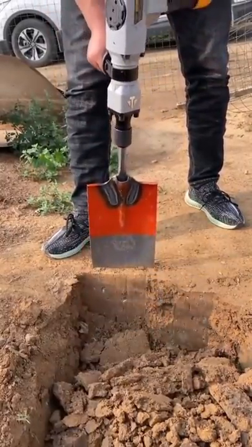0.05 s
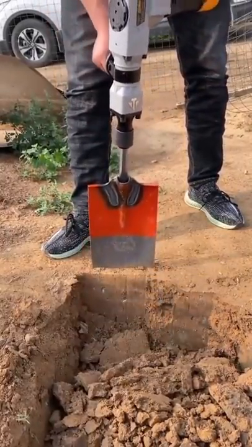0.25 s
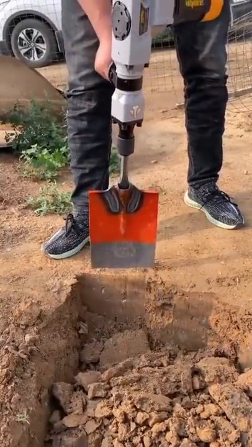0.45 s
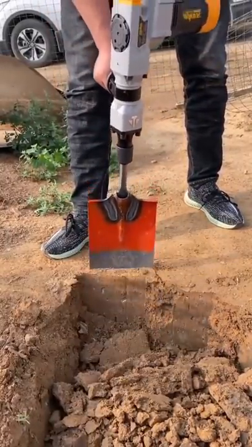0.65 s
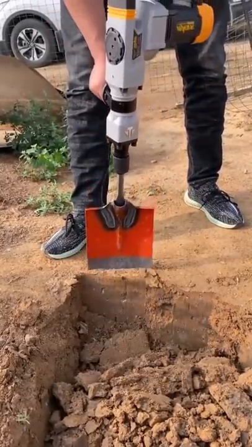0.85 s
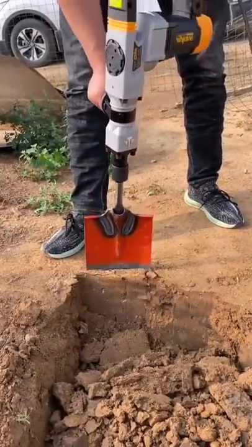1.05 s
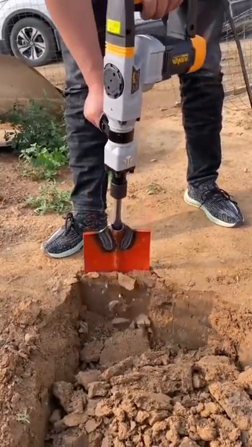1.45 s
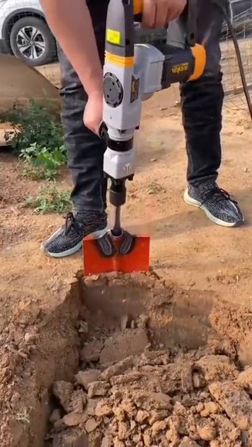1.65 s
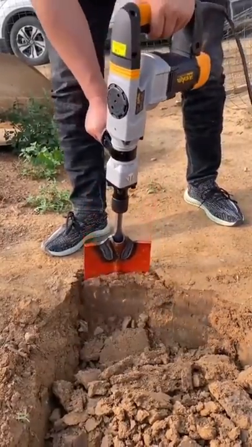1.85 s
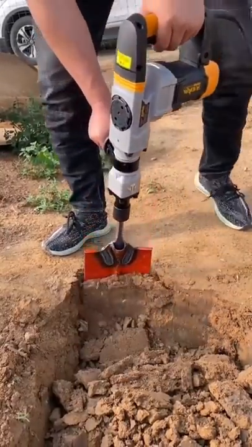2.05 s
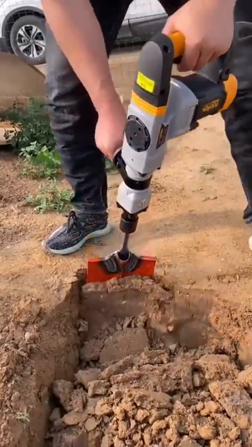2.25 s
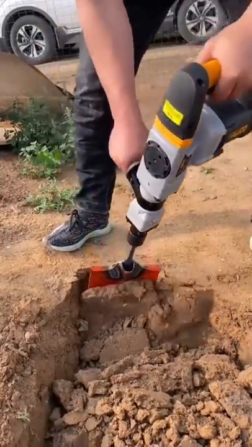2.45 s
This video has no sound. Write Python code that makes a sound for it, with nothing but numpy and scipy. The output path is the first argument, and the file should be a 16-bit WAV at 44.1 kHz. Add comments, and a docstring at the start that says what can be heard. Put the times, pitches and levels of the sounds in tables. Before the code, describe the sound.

An electric hammer spade pounds rapidly into dry soil with bright steel clatter, then stops.

```python
"""Rapid, bright steel hammering, close by and outdoors: an electric hammer drives a spade into dry soil
at about 39 blows a second. Each blow clashes in the chuck, rings the shank and sends a falling bending
wave through the blade, which the soil damps as it sinks in.
Then the motor coasts down and crumbs of soil trickle into the pit."""
import sys
import numpy as np
from scipy import signal
from scipy.fft import irfft
from scipy.io import wavfile
from scipy.ndimage import uniform_filter1d

SR = 44100
rng = np.random.default_rng(int(sys.argv[2]) if len(sys.argv) > 2 else 0)


def log_audio(samples):
    """Write samples as a 16-bit WAV file to the path given in sys.argv[1]."""
    # one column per channel
    frames = np.atleast_2d(samples).T
    # limit to full scale, then quantise
    limited = np.clip(frames, -1, 1)
    pcm = np.round(limited * 32767).astype(np.int16)
    wavfile.write(sys.argv[1], SR, pcm)


N = 114660
T = np.arange(N) / SR
BLOW_SAMPLES = 4096
BLOW_T, BLOW_HZ = T[:BLOW_SAMPLES], np.fft.rfftfreq(BLOW_SAMPLES, 1 / SR)
FIRST_BLOW_S, LAST_BLOW_S = .2376, 2.355

# blow strength (time [s], clash [dB], ping [dB], knock [dB], flex [dB], thump [dB])
BLOW_LEVELS = [(0.238, -6, -4.5, -16, -19, -18), (0.279, 4, 1, 8.5, 2.5, 13.5),
               (0.382, 2.5, 7.5, 6, 6.0, 9), (0.441, 1.5, -2, 4.5, -2.5, 14.5),
               (0.47, 1.5, 4.5, 2.5, 7, 9.5), (0.525, 1, 1.5, 4.5, -2, 9.0), (0.552, 0, -7, 4, 11, 15.5),
               (0.579, 2, 1, 7.5, 10, 0.5), (0.712, 1.5, -2.5, 4, 10, 12.5),
               (0.79, -0.5, -14, 4.5, 12.5, 3.5), (0.894, 1, -3, 3, -2.5, -11), (0.945, 1.5, 4, -3.5, 1, 3),
               (0.997, -0.5, 4, -9, -21, 0), (1.048, 1, 2.5, -15, -3, 6.5), (1.074, -0.5, -2, -10, -16, 1),
               (1.151, 1.5, -2, -2, -12, -8), (1.177, 2.5, 4.5, -5, -17, -11.0),
               (1.203, 1.5, -1, 3, -19, -5), (1.228, -1.5, -1.5, -3, -7, -4),
               (1.28, 1.5, -0.5, 3.5, -7.5, -9), (1.408, -3.5, 2.5, 3.5, -7, -0.5),
               (1.486, 0, 3, -11, -2, -5), (1.537, -0.5, 1.5, -1.5, -12, -1),
               (1.718, -1.0, -1, 1, -7, -1.5), (1.821, -3.5, -7, -6.5, 0.5, -3),
               (1.924, 0, -17, -0.5, -3.5, 1.5), (1.976, -1, -13, -2.5, -8, -16),
               (2.157, -0.5, -5, -6, -9.5, -3), (2.236, -3.5, -7.5, -21, -9, -7),
               (2.289, -4, 2, -7, -5.5, -16), (2.316, -7, 0.5, -22, -21, -23),
               (2.343, -15, -14.5, -21, -16, -35)]
# gear and chatter envelope (time [s], level [dB])
MOTOR_LEVEL = [(0, -110), (.14, -121), (.195, -88), (.228, -75), (.265, -63), (.3, -42), (.4, -35),
               (.75, -35.5), (1.2, -39.5), (1.8, -40), (2.2, -42.5), (2.32, -42), (2.36, -56.5),
               (2.42, -81), (2.6, -99)]
# free-running motor, also colours the crumbs (frequency [Hz], level [dB])
COAST_SPECTRUM = [(40, -25), (260, -22.5), (430, -6.5), (610, -22.5), (820, -7), (1040, -3.5),
                  (1280, -13.5), (1600, -3), (2140, -6.5), (2600, -1), (3340, -10.5), (4300, -6),
                  (5100, -12), (6200, -9.5), (8300, -12.5), (10300, -18), (11800, -22.5), (13000, -39)]


def amp(db):
    """Decibels to gain."""
    return 10 ** (np.asarray(db) / 20)


def unit(x):
    """Scale to rms 1."""
    return x / np.sqrt(np.mean(x ** 2) + 1e-20)


def curve(table, time_s, column=1):
    """Interpolate one column of a time table."""
    table = np.array(table)
    return np.interp(time_s, table[:, 0], table[:, column])


def spectrum(table, hz):
    """Interpolate a dB table over log frequency."""
    knots_hz, db = np.transpose(table)
    return np.interp(np.log(hz + 1), np.log(knots_hz + 1), db)


def colour(x, table):
    """Minimum-phase filter of unit energy with the given spectrum."""
    log_gain = np.log(amp(spectrum(table, abs(np.fft.fftfreq(BLOW_SAMPLES, 1 / SR)))))
    response = np.exp(np.conj(signal.hilbert(log_gain)))
    taps = np.fft.ifft(response).real[:BLOW_SAMPLES // 2]
    return signal.oaconvolve(x, taps / np.linalg.norm(taps))[:N]


def wander(samples):
    """Smooth random drift, rms 1."""
    return unit(uniform_filter1d(uniform_filter1d(rng.standard_normal(N), samples), samples))


def decay(t, t60_s):
    """Exponential decay from t = 0, zero before."""
    return (t >= 0) * np.exp(-np.log(1000) * np.maximum(t, 0) / t60_s)


def swell(t, peak_s, width_s):
    """Gaussian envelope."""
    return np.exp(-((t - peak_s) / width_s) ** 2)


def add(mix, start_s, sound):
    """Mix a sound in place."""
    part = mix[round(start_s * SR):][:len(sound)]
    part += sound[:len(part)]


def air():
    """Quiet outdoor air, fainter from the first blow on."""
    # air noise (frequency [Hz], level [dB])
    air_spectrum = [(25, -14), (100, -8), (280, -17.5), (550, -29.5), (16000, -36.5)]
    return amp(-85 - 7 * (T > FIRST_BLOW_S)) * colour(rng.standard_normal(N), air_spectrum)


def crumbs():
    """Loosened soil patters into the pit."""
    rate_per_s = 360
    grains = (rng.random(N) < rate_per_s / SR) * rng.standard_normal(N)
    burst = rng.standard_normal(BLOW_SAMPLES) * decay(BLOW_T, t60_s=.018)
    patter = colour(signal.oaconvolve(grains, burst)[:N], COAST_SPECTRUM)
    return amp(-69) * unit(patter) * swell(T, peak_s=2.52, width_s=.062)


def motor(turns):
    """Gears grind with each crank turn; switched off, the motor coasts with a sinking whine."""
    # gears and fan (frequency [Hz], level [dB])
    gear_spectrum = [(100, 6), (350, -3.5), (700, -17.5), (1200, -3.5), (2200, -8.5), (2750, 3.5),
                     (3200, -5.5), (4500, -4.5), (5150, -6.5), (6000, 1.5), (8000, 6), (9600, 9.5),
                     (10600, 6.5), (11200, 6.5), (13000, 7), (16000, -19)]
    swing_db = 2 * np.cos(2 * np.pi * (turns + .043))
    grind = unit(rng.standard_normal(N) * amp(-2 * wander(40) + 2 * wander(400) + swing_db))
    gears = colour(grind * amp(curve(MOTOR_LEVEL, T)), gear_spectrum)

    start_s, rise_s, fade_db_per_s, sag_hz_per_s = .145, .09, 17, 2200
    since_off_s = T - LAST_BLOW_S
    spin_up = np.clip((T - start_s) / rise_s, 0, 1) ** 2
    whirr_db = -61.5 + 1.5 * wander(300) - fade_db_per_s * np.maximum(since_off_s, 0)
    whine_hz = 2780 - sag_hz_per_s * since_off_s + 22 * wander(100)
    phase = 2 * np.pi * np.cumsum(whine_hz) / SR
    whine = np.sin(phase) + amp(-9) * np.sin(2.31 * phase)
    whine *= amp(-62.5) * swell(T, peak_s=2.445, width_s=.06)
    whirr = spin_up * amp(whirr_db) * colour(rng.standard_normal(N), COAST_SPECTRUM)
    return gears + whine + whirr


def chatter():
    """Loose parts in the chuck clink at random, following the motor level."""
    rate_per_s, spread_db = 260, 5
    sizes = amp(spread_db * np.minimum(rng.exponential(1, N), 3))
    clinks = sizes * (rng.random(N) < rate_per_s / SR)
    power = signal.oaconvolve(clinks ** 2, decay(BLOW_T, t60_s=.02) ** 2)[:N]
    return amp(curve(MOTOR_LEVEL, T) - 3) * unit(np.sqrt(abs(power)) * rng.standard_normal(N))


def bending_wave(gain):
    """Low bending waves travel slower: a knock falls to a deep thump."""
    delay_s, lead_s = .0155, .0031  # group delay = delay_s * sqrt(100 Hz / f) - lead_s
    phase = .8 - 2 * np.pi * (2 * delay_s * np.sqrt(100 * BLOW_HZ) - lead_s * BLOW_HZ)
    return irfft(gain * np.exp(1j * phase))[:BLOW_SAMPLES // 2]


def bites(blows):
    """On some blows the blade bites hard soil with a pitched thud."""
    # thuds, each on its nearest blow (time [s], pitch [Hz], level [dB])
    thuds = [(.279, 950, 3), (.316, 990, 7), (.382, 1020, -1), (.412, 300, 6), (.442, 370, 6),
             (.498, 460, 10.5), (.606, 350, 8), (.633, 417, -5), (.659, 1050, 5.5), (.686, 388, 13),
             (.712, 420, 3), (.738, 540, 7), (.764, 800, 4), (.79, 900, 11), (.816, 960, 5),
             (.842, 1480, 9), (.893, 1500, 5.5), (.945, 275, -7), (1.049, 227, -3), (1.229, 455, 0),
             (1.332, 418, 1.5), (1.383, 1090, 7.5), (1.975, 990, 3.5), (2.001, 930, 4), (2.155, 860, -8)]
    out = np.zeros(N)
    for near_s, pitch_hz, db in thuds:
        blow_s = min((s for s, _ in blows), key=lambda s: abs(s - near_s))
        width_hz = 36 + .048 * pitch_hz
        peak = np.exp(-.5 * ((BLOW_HZ - pitch_hz) / width_hz) ** 2)
        add(out, blow_s, bending_wave(amp(db) * peak))
    return out


def flex(blows):
    """Each blow bends the blade, damped by the soil around it."""
    # bending wave (frequency [Hz], level [dB])
    flex_spectrum = [(25, -40), (35, -14), (50, 2.5), (75, -1), (120, -3), (200, -2), (400, -9),
                     (550, -10.5), (700, -40), (900, -19), (1200, -10), (2000, -20)]
    base_db = 4.5 + spectrum(flex_spectrum, BLOW_HZ)
    knots_hz = np.geomspace(50, 2000, num=18)
    dc_block = BLOW_HZ / (BLOW_HZ + 10)
    out = np.zeros(N)
    for blow_s, _ in blows:
        knock_db, flex_db, thump_db = (curve(BLOW_LEVELS, blow_s, column) for column in (3, 4, 5))
        soil_db = spectrum([(100, thump_db), (190, flex_db), (500, flex_db), (800, knock_db)], BLOW_HZ)
        scatter_db = 3.2 * spectrum(np.c_[knots_hz, rng.standard_normal(len(knots_hz))], BLOW_HZ)
        add(out, blow_s, bending_wave(amp(base_db + soil_db + scatter_db) * dc_block))
    return out


def blade(blows, drive):
    """The blade knocks on the soil and flexes."""
    # hollow knock (frequency [Hz], level [dB])
    knock_spectrum = [(250, -9), (550, 0.5), (800, 0.5), (1000, -1), (1300, -3), (1700, 3), (2300, -4.5),
                      (4000, -23.5)]
    knock_over_clash_db = curve(BLOW_LEVELS, T, column=3) - curve(BLOW_LEVELS, T)
    knock = amp(knock_over_clash_db - 15.5) * colour(drive, knock_spectrum)
    rumble_cut = signal.butter(2, 45, "high", fs=SR, output="sos")
    return signal.sosfilt(rumble_cut, knock + flex(blows))


def dead_band(x):
    """A notch that shifts as the blade sinks."""
    # notch path (time [s], centre [Hz], depth [0-1])
    notch = [(.28, 630, 0.84), (.35, 650, 0.75), (.42, 735, 0.66), (.5, 660, 0.25), (.59, 713, 1),
             (.71, 700, 1), (.765, 696, 0.14), (.795, 424, 1), (.85, 450, 1), (.9, 630, 0.93),
             (.96, 675, 0), (1.02, 520, 0.9), (1.13, 525, 1), (1.17, 640, 0.5), (1.23, 233, 0.83),
             (1.29, 510, .85), (1.35, 560, 0.77), (1.46, 620, .9), (1.6, 685, 0.43), (1.7, 810, 0),
             (1.82, 800, 0.54), (1.94, 620, 0.83), (2.04, 530, 0.1), (2.1, 815, 0.27), (2.2, 580, 0.96),
             (2.29, 700, 0), (2.36, 594, 0.5)]
    width_hz = 340
    carrier = np.exp(2j * np.pi * np.cumsum(curve(notch, T)) / SR)
    lowpass = signal.butter(2, width_hz / 2, fs=SR, output="sos")
    baseband = signal.sosfiltfilt(lowpass, signal.hilbert(x) / carrier)
    return x - curve(notch, T, column=2) * (carrier * baseband).real


def ping(blows):
    """The shank's main note swells after each blow, then is choked; soil deadens it over time."""
    pitch_hz, damping_db_per_s = 5125, 2.5
    out = np.zeros(N)
    for blow_s, _ in blows:
        late, phase, detune = rng.standard_normal(3)
        peak_s = .006 * (1 + .15 * late)
        tail = amp(-16) * decay(BLOW_T - peak_s, t60_s=.07)
        envelope = np.maximum(swell(BLOW_T, peak_s, width_s=.0034), tail)
        note = np.sin(2 * np.pi * pitch_hz * (1 + .009 * detune) * BLOW_T + .9 * phase)
        level_db = -24.5 - damping_db_per_s * blow_s + curve(BLOW_LEVELS, blow_s, column=2)
        add(out, blow_s, amp(level_db) * envelope * note)
    return out


def ring(drive):
    """Blows and chatter ring the steel; the load shifts each mode's pitch and strength."""
    # shank and blade modes (frequency [Hz], bandwidth [Hz], level [dB])
    modes = [(2633, 136, -18), (2873, 180, -10.5), (3738, 100, -10.5), (4340, 174, -9.5), (5064, 140, -6),
             (6264, 73, -7.5), (7960, 300, -9), (8370, 430, -5), (8810, 100, -6.5), (9360, 200, -2.5),
             (9490, 130, -8.5), (9950, 230, -7.5)]
    drift, swing_db = .006, 4.5
    out = np.zeros(N)
    for hz, width_hz, db in modes:
        carrier = np.exp(2j * np.pi * np.cumsum(hz * (1 + drift * wander(1500))) / SR)
        pole = np.exp(-np.pi * width_hz / SR)
        push = drive * amp(db + swing_db * np.clip(wander(700), -2, 2))
        out += (carrier * signal.lfilter([np.sqrt(1 - pole ** 2)], [1, -pole], push / carrier)).real
    return amp(-8) * out


def snap(x, turns):
    """The top treble peaks at each contact and varies with how squarely the blow lands."""
    cutoff_hz, scatter_db, fall_db_per_s = 10970, 10.5, 7
    treble = signal.sosfiltfilt(signal.butter(8, cutoff_hz, "high", fs=SR, output="sos"), x)
    swing_db = 3 * np.cos(2 * np.pi * (turns - .1)) + scatter_db * wander(700)
    treble_db = (swing_db - 14 - fall_db_per_s * T) * (T < LAST_BLOW_S)
    return x + treble * (amp(treble_db) - 1)


def clash(drive):
    """Rattle in the chuck, heard as bright steel."""
    # steel on steel (frequency [Hz], level [dB])
    clash_spectrum = [(300, -26), (700, -20.5), (1000, -13), (1900, 0.5), (2400, 0), (2800, 2.5),
                      (3200, -1), (3800, -3), (4050, 1), (4300, -2.5), (4750, 0), (5400, 6.5), (6000, 2),
                      (6300, -1), (6650, 2), (7900, 6.5), (9700, -1), (10600, 2.5), (10900, -9.5),
                      (12000, -4.5), (13200, -18.5), (16000, -34.5)]
    return amp(-2.5) * colour(drive, clash_spectrum)


def rattle(blows):
    """The striker slides in and cracks on the shank, which rattles and rebounds in the chuck."""
    lead_s, slide_s, rise_s, rebound_s, sink_s = .008, .002, .0013, .0036, .25
    alike = .52  # blow-to-blow noise correlation
    out, t = np.zeros(N), BLOW_T - lead_s
    grain = rng.standard_normal(BLOW_SAMPLES)
    for blow_s, gain in blows:
        grain = alike * grain + np.sqrt(1 - alike ** 2) * rng.standard_normal(BLOW_SAMPLES)
        length, hardness, late, bounce, flight = rng.random(5)
        # longer until the blade has sunk in
        hold_s = .0037 * (.5 + length) + .004 * np.exp(-(blow_s - FIRST_BLOW_S) / sink_s)
        slide = amp(-29) * np.exp(-abs(t) / slide_s)
        body = amp(-27) * np.clip(t / rise_s, 0, 1) * decay(np.maximum(t - hold_s, 0), t60_s=.031)
        crack = amp(-28.5) * (.5 + hardness) * decay(t - rise_s * late, t60_s=.005)
        rebound = amp(-43) * 2 * bounce * decay(t - rebound_s * (1 + flight) / 2, t60_s=.005)
        add(out, blow_s - lead_s, gain * grain * (slide + body + crack + rebound))
    return out


def crank():
    """One blow per turn: returns turns since the first blow, and blows as (time [s], gain)."""
    # hammer speed (time [s], rate [blows/s])
    speed = [(0.24, 22.41), (0.3, 27.26), (0.37, 31.98), (0.45, 35.16), (0.56, 37.13), (0.72, 38.16),
             (0.9, 38.88), (1.25, 38.9), (1.6, 38.71), (2.05, 38.84), (2.22, 37.93), (2.35, 36.78)]
    jitter_s, scatter_db = .00025, 1
    turns = np.cumsum(curve(speed, T)) / SR
    turns -= np.interp(FIRST_BLOW_S, T, turns)
    count = int(np.interp(LAST_BLOW_S, T, turns)) + 1
    times_s = np.interp(np.arange(count), turns, T)
    late, strong = rng.standard_normal((count, 2)).T
    gains = amp(curve(BLOW_LEVELS, times_s) + scatter_db * strong)
    return turns, list(zip(times_s + jitter_s * late, gains))


def scene():
    """Hammer and spade over motor, soil and air; mono."""
    turns, blows = crank()
    strikes = rattle(blows)
    background = air()
    drive = strikes + chatter()
    hammer = snap(clash(drive) + motor(turns), turns)
    tool = hammer + ring(drive) + ping(blows) + blade(blows, strikes)
    return (dead_band(tool) + bites(blows) + crumbs() + background)[None]


def record(dry):
    """Linear-phase band limit."""
    cutoff_hz = 16100
    taps = signal.firwin(511, cutoff_hz, window=("kaiser", 9), fs=SR)
    return signal.oaconvolve(dry, taps[None], "same")


dry = scene()
out = record(dry)
log_audio(out)
```